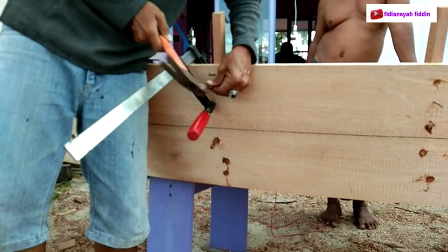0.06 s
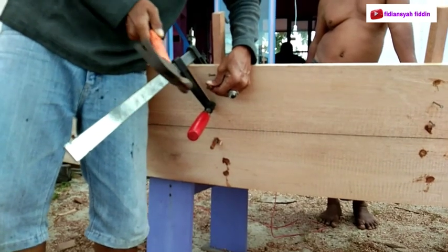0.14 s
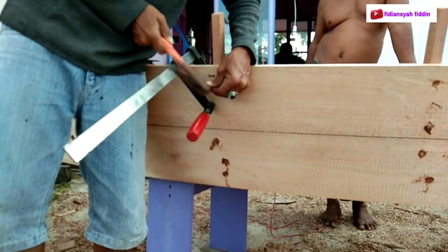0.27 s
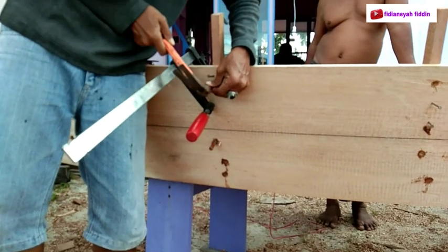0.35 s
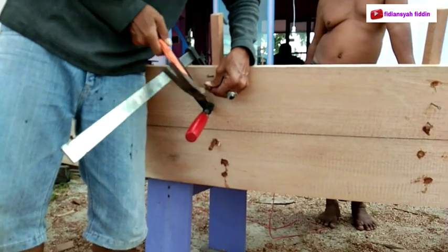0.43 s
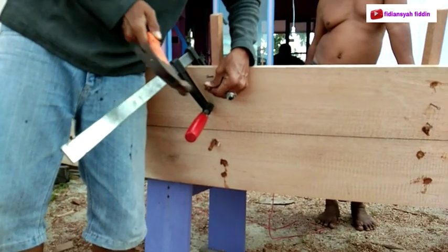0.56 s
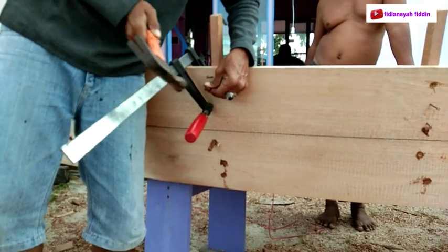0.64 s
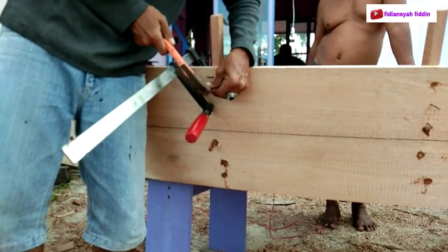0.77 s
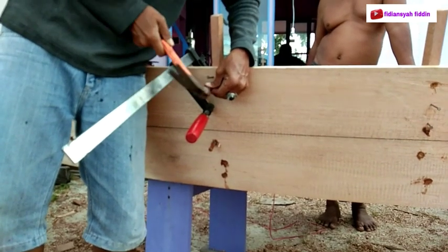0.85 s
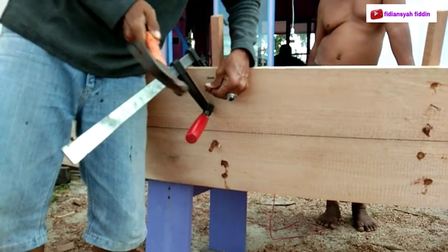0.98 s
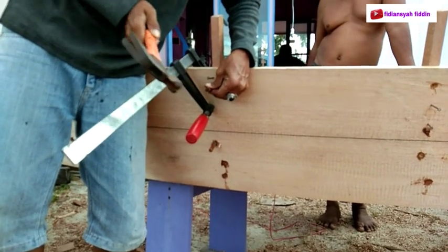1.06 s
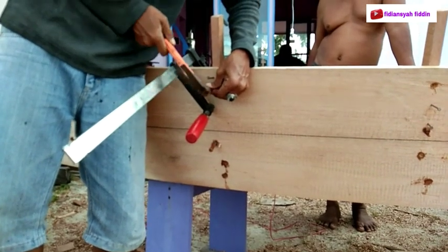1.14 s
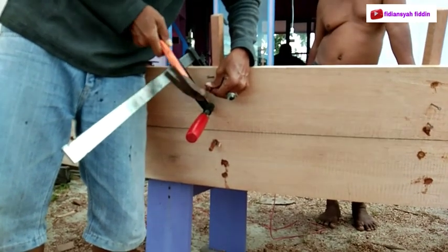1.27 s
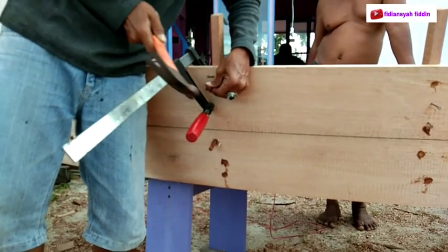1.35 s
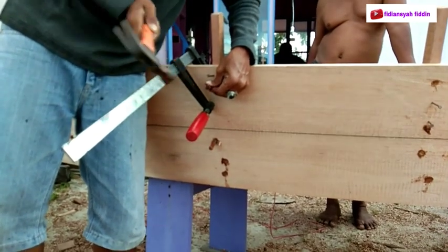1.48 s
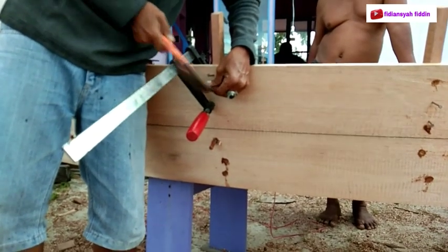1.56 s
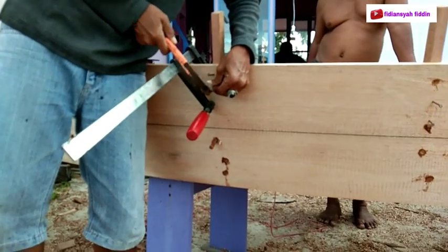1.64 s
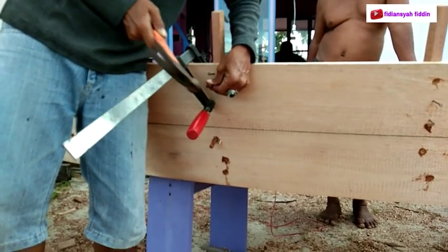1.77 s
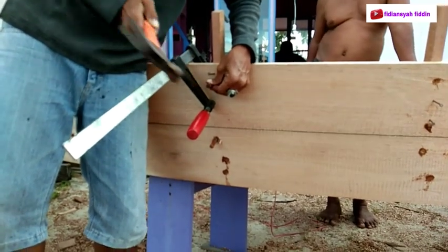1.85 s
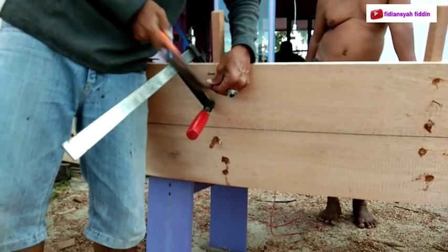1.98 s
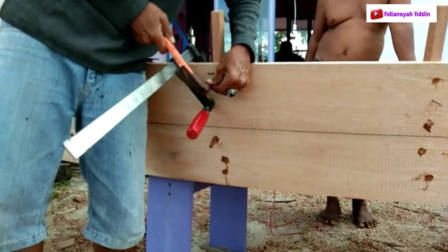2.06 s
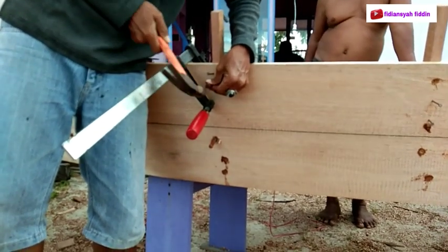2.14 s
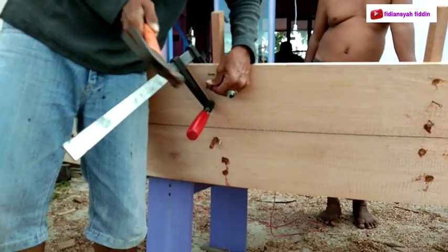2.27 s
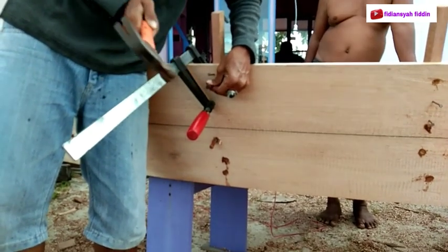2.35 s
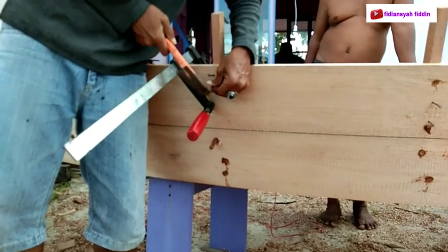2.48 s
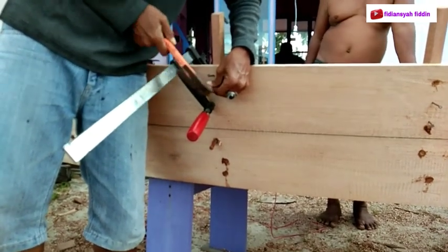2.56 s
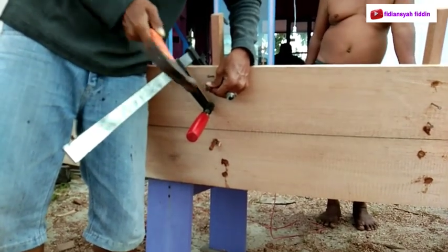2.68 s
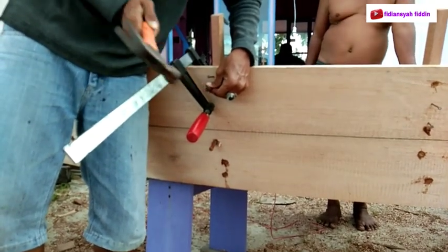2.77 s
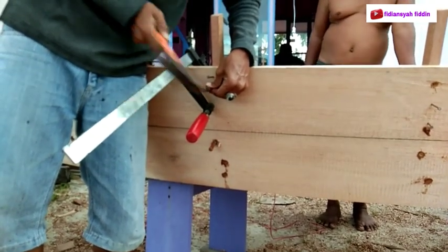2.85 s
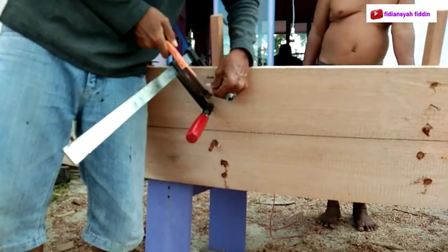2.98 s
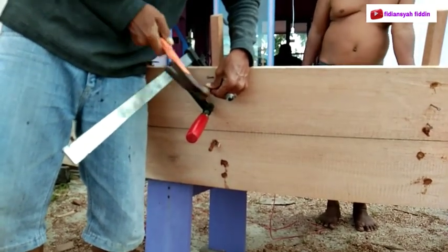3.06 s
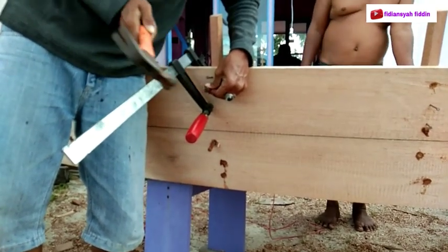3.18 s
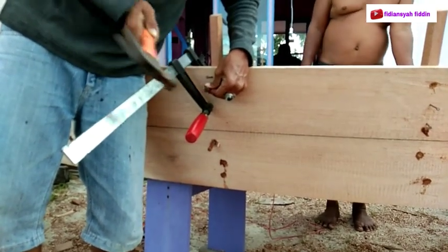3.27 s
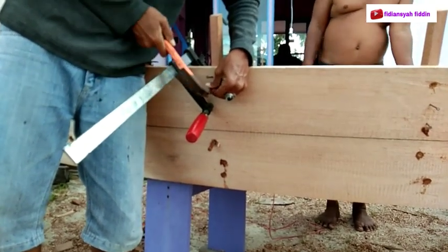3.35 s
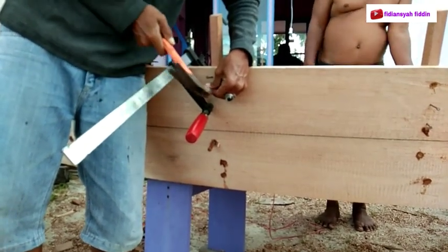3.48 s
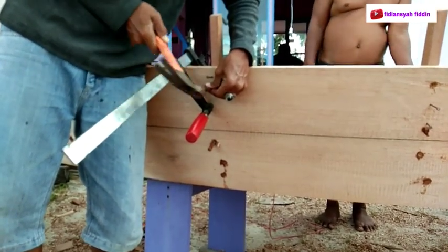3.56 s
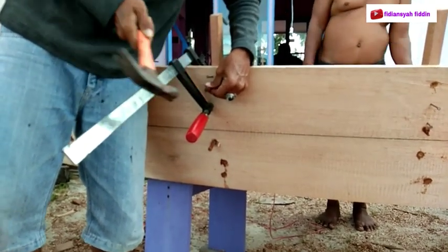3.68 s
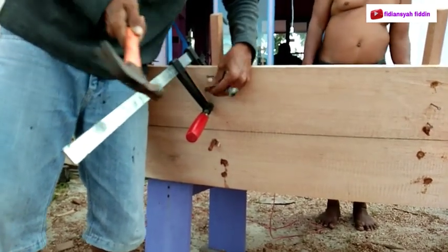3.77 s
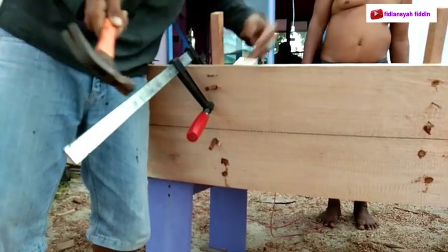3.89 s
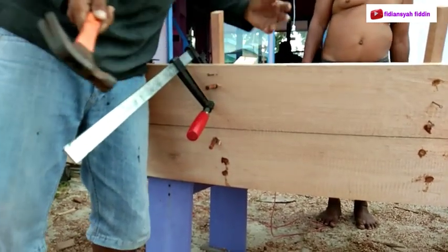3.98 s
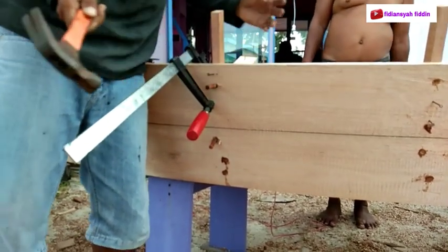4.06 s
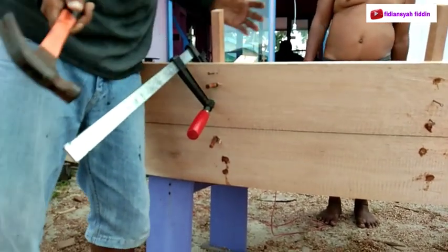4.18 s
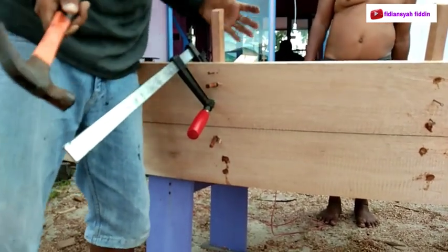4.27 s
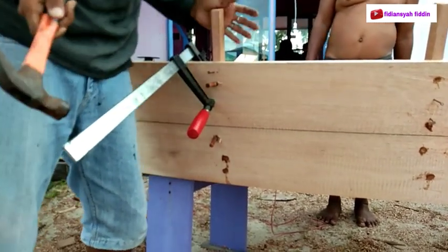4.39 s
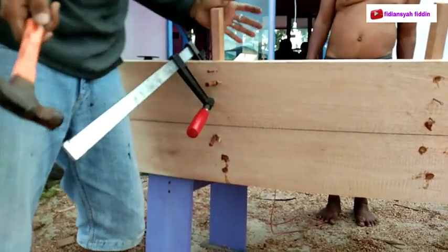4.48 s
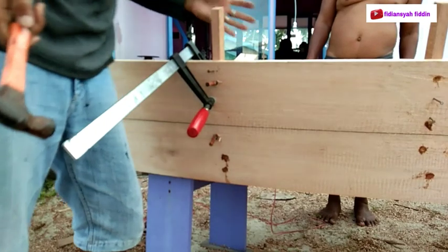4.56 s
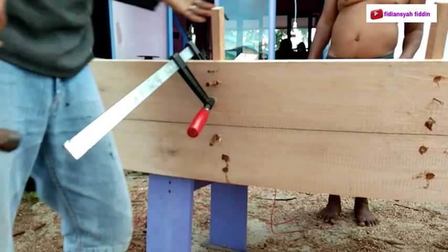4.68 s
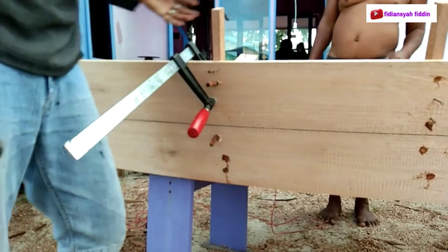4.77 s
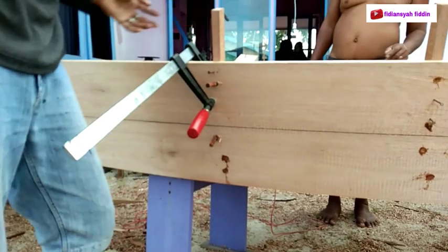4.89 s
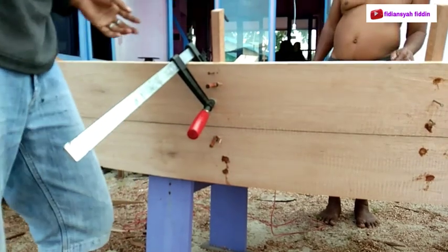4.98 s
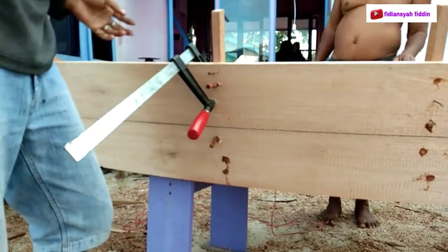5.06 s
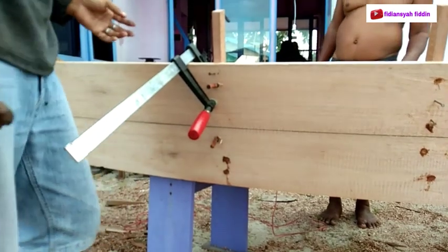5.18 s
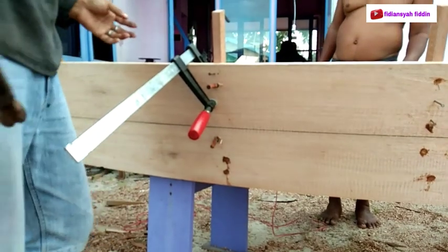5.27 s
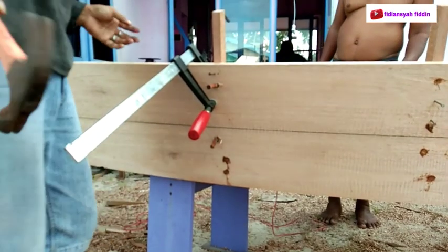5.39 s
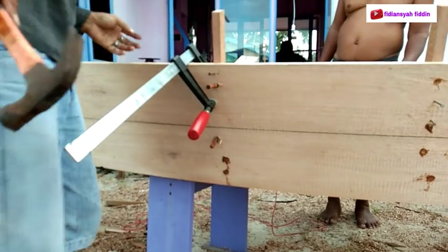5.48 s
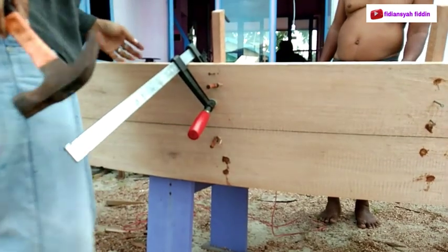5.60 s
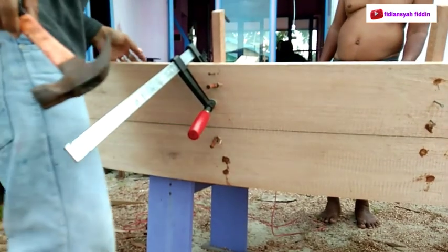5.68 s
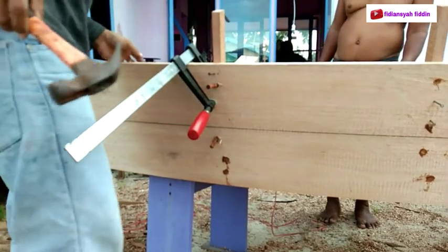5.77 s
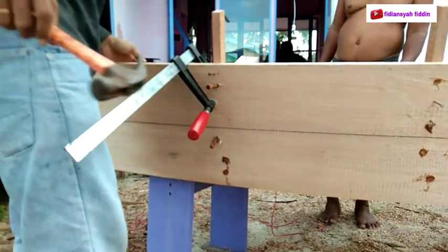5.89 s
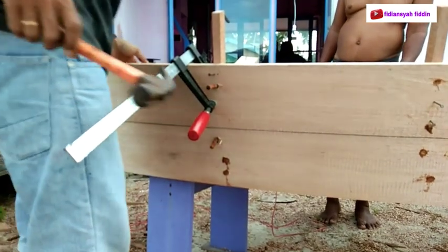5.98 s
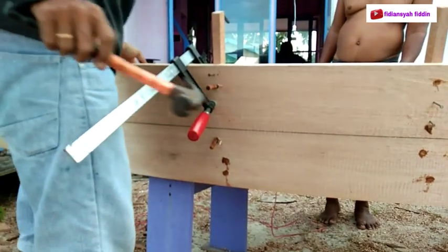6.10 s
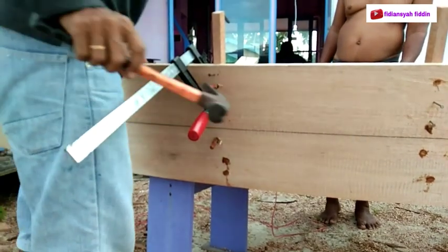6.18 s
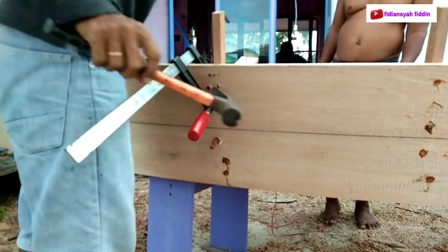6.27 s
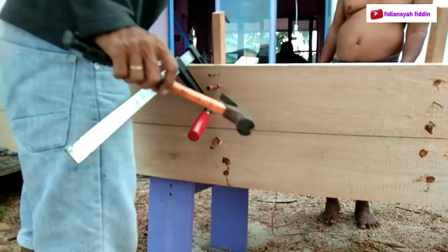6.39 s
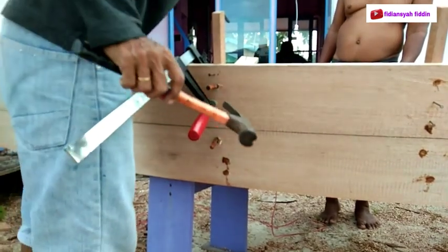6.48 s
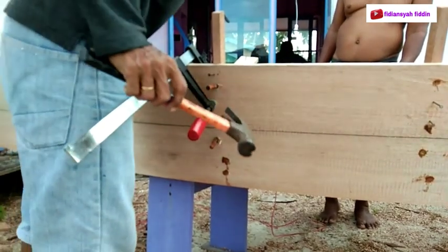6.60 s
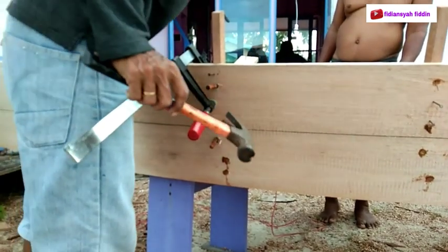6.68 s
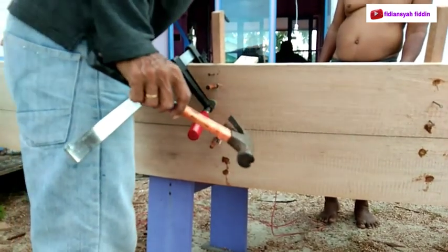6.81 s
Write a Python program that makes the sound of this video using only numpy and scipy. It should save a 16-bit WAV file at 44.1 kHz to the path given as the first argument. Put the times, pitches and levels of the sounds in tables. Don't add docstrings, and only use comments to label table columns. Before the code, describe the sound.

Eight hard, loud hammer blows strike a nail into a clamped wooden plank, evenly paced, then breezy outdoor hiss and a few dull knocks.

```python
import sys
import numpy as np
from scipy import signal
from scipy.io import wavfile
from scipy.ndimage import uniform_filter1d

SR = 44100
rng = np.random.default_rng(int(sys.argv[2]) if len(sys.argv) > 2 else 0)


def file_out(sig):
    cols = np.atleast_2d(sig).T
    lim = np.clip(cols, -1, 1)
    pcm = np.round(lim * 32767).astype(np.int16)
    wavfile.write(sys.argv[1], SR, pcm)


def ratio(d):
    e = np.asarray(d, float) / 20
    return 10 ** e


N = 301644

# start in seconds, peak level in dB, plank boom in dB,
# brightness in dB per octave, rebound level of the frame in dB.
BLOWS = [
    (0.332, -13.5, -2, -0.5, -20),
    (0.76, -12.5, -12, 0.5, -19),
    (1.171, -12.5, 4, 1, -19.5),
    (1.598, -12, 0.5, 1, -18.5),
    (2.0438, -11.5, 6, 1, -16.5),
    (2.4849, -11.5, -21, 0.5, -21.5),
    (2.9216, -12.5, 8.5, 1.5, -20),
    (3.355, -11.5, 5, 1, -19.5),
]
# delay in seconds, level in dB relative to
# the rebound, note in Hz, note level in dB, ring length factor.
REBOUNDS = [
    (.042, -1.5, 298.1, 4.5, 0.53),
    (.045, -6, 237, 4, 0.48),
    (.088, -14.5, 256, -11, 1),
]
# frequency in Hz, level in dB, decay time t60 in seconds.
BOOM_MODES = [(67, 6, 0.21), (100, -28, 0.15), (132, -20, 0.073), (181, -7, 0.17), (237, 0.5, 0.11),
              (277, -6, 0.15), (300, 0, 0.47), (342, 2, 0.13), (460, 10.5, 0.14), (500, -6.5, 0.38)]
MIDDLE_MODES = [(584, -11, 0.4), (621, -1, 0.11), (758, -7.5, 0.3), (806, -4, 0.23), (970, -1, 0.15)]
RING_MODES = [(1245, 3.5, 0.089), (1681, -5.5, 0.1), (1950, -0.5, 0.19), (2132, -4, 0.082),
              (2244, -10, 0.067), (2668, 3, 0.065), (2903, -5, 0.1), (3377, -3, 0.053), (4030, -3, 0.056),
              (4606, -8.5, 0.14)]
NAIL_MODES = [(4730, 6.5, 0.013), (5270, 9.5, 0.0083), (5926, -0.5, 0.013), (6440, 1, 0.007)]
# frequency in Hz, density in dB per Hz.
CLATTER_COLOUR = [(35, -38), (60, -10), (250, 8.5), (700, -7.5), (1200, -4), (2000, -4.5), (3200, -9.5),
                  (6000, -14.5), (7500, -33), (9500, -49.5), (15000, -53), (22000, -83)]
# frequency in Hz, t60 in seconds.
CLATTER_T60 = [(60, 0.71), (250, 0.4), (1000, 0.22), (4000, 0.24), (7000, 0.24), (12000, 0.19)]
# frequency in Hz, density in dB per Hz.
SOFT_COLOUR = [(35, -40), (70, -6), (250, 3), (600, -3), (1100, -5.5), (2400, -13), (3500, -25.5),
               (6000, -32), (9000, -70), (22000, -90)]
# start in seconds, peak level in dB, note in Hz,
# note level in dB, ring length factor.
THUDS = [
    (.034, -25, 842, -10, 0.4),
    (.05, -29.5, 193, -4, 0.83),
    (.458, -29.5, 756, -12, 0.73),
    (0.961, -43, 97, 12, 0.96),
    (5.765, -32, 160, 15, 0.35),
    (6.65, -44, 289, 13, .6),
]
# start in seconds, peak level in dB,
# note in Hz, note level in dB, ring length factor.
TAPS = [(.001, -32, 204, 9, 0.47), (3.01, -26.5, 930, -4, .45), (3.05, -33, 960, -19, 0.68),
        (3.443, -24.5, 1445, -6, 0.45), (3.486, -32, 956, -9, 0.82), (3.845, -33.5, 2285, -1.5, 0.6),
        (3.876, -27, 2340, -10, 0.44), (3.88, -31, 298, 8.5, 0.76), (3.935, -31.5, 300, 8, 0.77),
        (5.7464, -21, 279, 4.5, 0.15), (5.754, -25.5, 157, -3, 0.41), (5.787, -28.5, 260, -5, 0.48)]
# start in seconds, length in seconds,
# first pitch in Hz, last pitch in Hz, level in dB.
CROW = [
    (2.24, .19, 470, 528, -47.5),
    (2.42, .37, 539, 521, -50.5),
    (2.771, 0.17, 518, 539, -48),
    (3.01, .19, 587, 568, -48),
    (3.13, .21, 460, 472, -49),
    (3.935, .19, 443, 427, -43.5),
]
# time in seconds, hiss level in dB.
WIND = [(0.0, -39), (0.21, -42), (0.91, -36.5), (1.94, -39), (2.44, -37.5), (2.66, -41), (3.09, -40.5),
        (3.66, -42), (3.89, -37), (4.04, -34), (4.95, -28), (5.18, -28.5), (5.98, -33.5), (6.38, -32.5),
        (6.84, -35.5)]
# frequency in Hz, density in dB per Hz.
LEAVES_COLOUR = [(26, -48), (48, -19), (65, -2), (108, -3), (317, -4), (395, -7), (728, -4), (1250, -5.5),
                 (2590, -3), (3470, -9.5), (4890, -5.5), (6710, -14.5), (9450, -32.5), (15400, -43)]


def read(points, hz):
    f, value = np.transpose(points)
    return np.interp(np.log(hz + 1), np.log(f + 1), value)


def evened(x):
    return x / np.sqrt(np.mean(x ** 2) + 1e-20)


def add(mix, s, sound):
    part = mix[round(s * SR):][:len(sound)]
    part += sound[:len(part)]


def ringing(modes, t, longer, rise_cycles):
    hz, db, t60 = np.transpose(modes)[:, :, None]
    spot = rng.standard_normal((4, len(modes), 1))
    hz = hz * (1 + 0.0039 * spot[0])
    lag_hz = 37 + 2 * spot[0]
    rise = 1 - np.exp(-t * hz / rise_cycles)
    main = np.sin(2 * np.pi * hz * t + hz / lag_hz)
    twin_hz = hz * (1 + 0.0246 * spot[2])
    twin = 0.5 * np.sin(2 * np.pi * twin_hz * t + 2 * spot[3])
    decay = ratio(db + spot[1] - 60 * t / (t60 * longer))
    return (decay * rise * (main + twin)).sum(0)


def clatter(noise, spectrum, longer, tilt_db, hold_s):
    hz, t, z = signal.stft(noise, SR, nperseg=512)
    octaves = np.log2(np.clip(hz, 500, 7000) / 1000)
    colour = evened(ratio(read(spectrum, hz) + tilt_db * octaves))
    t60 = read(CLATTER_T60, hz)[:, None] * longer
    fade_db = 60 * np.maximum(t - hold_s, 0) / t60
    return signal.istft(z * colour[:, None] * ratio(-fade_db), SR, nperseg=512)[1][:len(noise)]


def blow(row, same):
    s, peak_db, boom_db, tilt_db, _ = row
    longer = 0.83 - 0.061 * tilt_db
    middle_db = -1.5 + 0.53 * tilt_db
    t = np.arange(len(same)) / SR
    noise = 0.6 * same + 0.8 * rng.standard_normal(len(t))
    crack = 1 + ratio(5) * np.exp(-t / 0.0067)
    sound = ratio(-1.5) * crack * clatter(noise, CLATTER_COLOUR, longer, tilt_db, hold_s=0.029)
    sound = sound + ratio(boom_db - 10.5) * ringing(BOOM_MODES, t, longer, 5.7)
    sound = sound + ratio(middle_db) * ringing(MIDDLE_MODES, t, longer, 0.65)
    sound = sound + ratio(1) * ringing(RING_MODES, t, longer, 0.52)
    sound = sound + ratio(8) * ringing(NAIL_MODES, t, 0.54, 1.4)
    sound = sound * (1 - np.exp(-t / 0.0005))
    shock = ratio(17) * np.sin(2 * np.pi * 1900 * t) * np.exp(-t / 0.0008)
    shock = shock * (1 - np.exp(-t / 0.00008))
    return s, ratio(peak_db) * (sound + shock)


def knock(row, tilt_db):
    s, peak_db, hz, note_db, longer = row
    t = np.arange(SR // 3) / SR
    sound = clatter(rng.standard_normal(len(t)), SOFT_COLOUR, longer, tilt_db + 4.5, hold_s=0.0059)
    sound = sound + ringing([(hz, note_db, 0.3)], t, longer, 0.098)
    return s, ratio(peak_db) * sound * (1 - np.exp(-t / 0.00027))


def hull():
    rebound_tilt_db, thud_tilt_db, tap_tilt_db = -5, -11.5, -2.5
    out = np.zeros(N)
    same = rng.standard_normal(SR // 2)
    for row in BLOWS:
        add(out, *blow(row, same))
    for s, *_, rebound_db in BLOWS:
        for delay, under_db, *note in REBOUNDS:
            add(out, *knock((s + delay, rebound_db + under_db, *note), rebound_tilt_db))
    for row in THUDS:
        add(out, *knock(row, thud_tilt_db))
    for row in TAPS:
        add(out, *knock(row, tap_tilt_db))
    return out


def cockerel():
    throat_width_hz, beak_hz, beak_width_hz, beak_db = 320, 2940, 300, -5
    rise_s, fall_s, flutter_db = 0.014, 0.036, 2.2
    out = np.zeros(N)
    for s, length, first_hz, last_hz, db in CROW:
        t = np.arange(0, length, 1 / SR)
        glide = first_hz + (last_hz - first_hz) * t / length
        throat = 4.13 * glide - 11.6 * np.maximum(last_hz - glide, 0)
        drifts = rng.standard_normal((2, len(t)))
        waver, flutter = (evened(uniform_filter1d(v, size=900)) for v in drifts)
        pitch = glide * (1 + 0.0071 * waver)
        k = np.arange(2, 10)[:, None]
        shape = 1 / (1 + ((k * pitch - throat) / throat_width_hz) ** 2)
        shape = shape + ratio(beak_db) / (1 + ((k * pitch - beak_hz) / beak_width_hz) ** 2)
        harmonics = np.sin(2 * np.pi * k * np.cumsum(pitch) / SR)
        voice = evened((shape * harmonics).sum(0))
        swell = np.minimum(np.minimum(t / rise_s, (length - t) / fall_s), 1)
        add(out, s, swell * ratio(db + flutter_db * flutter) * voice)
    return out


def wind():
    frames, hz = N // 256 + 5, np.fft.rfftfreq(1024, 1 / SR)
    a, b, patches = rng.standard_normal((frames, 513, 3)).T
    patches = evened(uniform_filter1d(uniform_filter1d(patches, 14, 0), 14, 1))
    hiss_db = np.interp(np.arange(frames) * 256 / SR, *np.transpose(WIND))
    gust_db = hiss_db + 35
    rumble_db = 4 + 0.22 * gust_db
    top_db = -2.1 + 0.15 * gust_db
    low = 1 / (1 + (hz[:, None] / 500) ** 2)
    high = 1 / (1 + (8000 / (hz[:, None] + 1)) ** 8)
    shape = ratio(read(LEAVES_COLOUR, hz))[:, None]
    shape = shape / np.sqrt((shape[16:140] ** 2).sum())
    z = (a + 1j * b) * shape * ratio(hiss_db + low * rumble_db + high * top_db + 0.48 * patches)
    return ratio(-1.5) * signal.istft(z, nperseg=1024, noverlap=768)[1][:N]


def scene():
    return np.tile(hull() + wind() + cockerel(), (2, 1))


def low_pass(x):
    return signal.sosfilt(signal.butter(12, 16510, fs=SR, output="sos"), x)


def record(dry):
    ceiling_db, knee, top_cut_hz = -2.7, 5, 15750
    cut = signal.sosfilt(signal.butter(5, 61, "high", fs=SR, output="sos"), dry)
    over = abs(cut) / ratio(ceiling_db)
    overload = cut / (1 + over ** knee) ** (1 / knee) - cut
    below = signal.oaconvolve(overload, signal.firwin(101, 7500, fs=SR)[None], "same")
    drift = signal.sosfilt(signal.butter(2, 45, fs=SR, output="sos"), rng.standard_normal(N))
    self_noise = ratio(-69) * evened(drift) * (1 + 8 * uniform_filter1d(over, size=900))
    whole = cut + below + ratio(-10.5) * (overload - below) + self_noise
    top_cut = signal.firwin(601, top_cut_hz, window=("kaiser", 8), fs=SR)
    band = signal.oaconvolve(whole, top_cut[None], "same")
    spill_band = signal.firwin(601, [top_cut_hz, 16450], pass_zero=False, fs=SR)
    spill = signal.oaconvolve(overload, spill_band[None], "same")
    mix = band + ratio(-22) * spill
    return low_pass(mix)


dry = scene()
out = record(dry)
file_out(out)
```